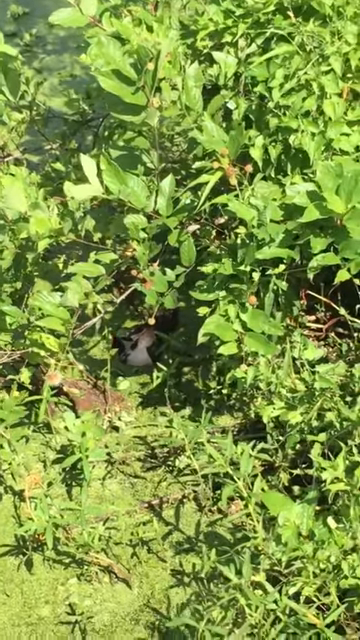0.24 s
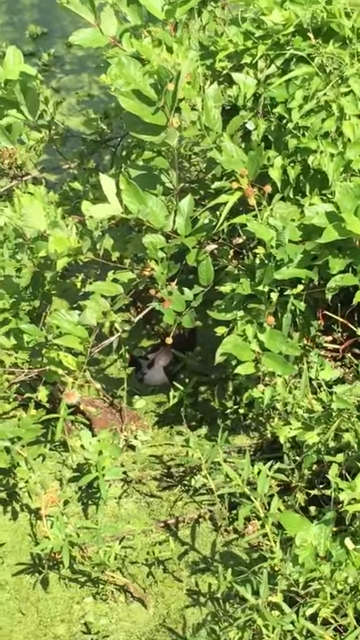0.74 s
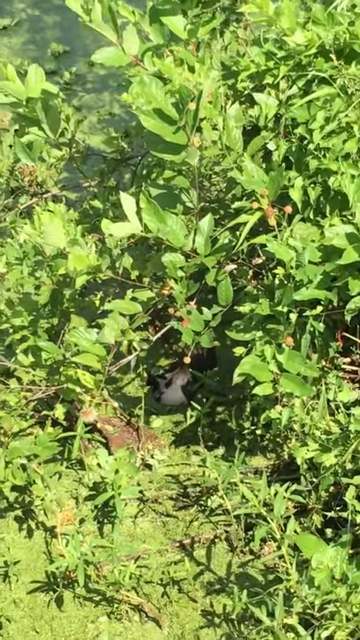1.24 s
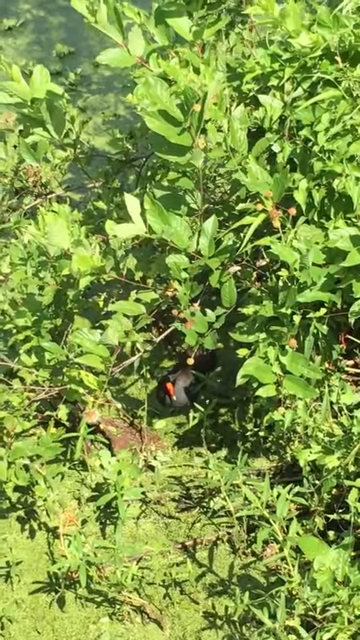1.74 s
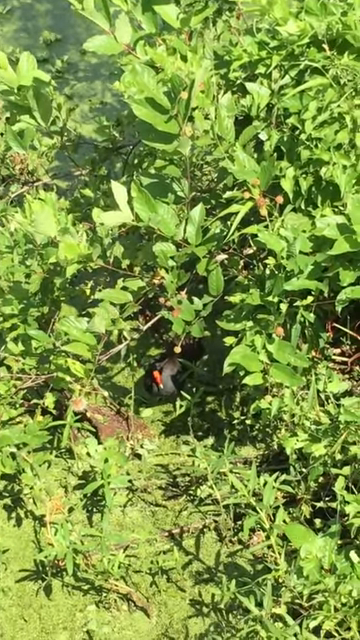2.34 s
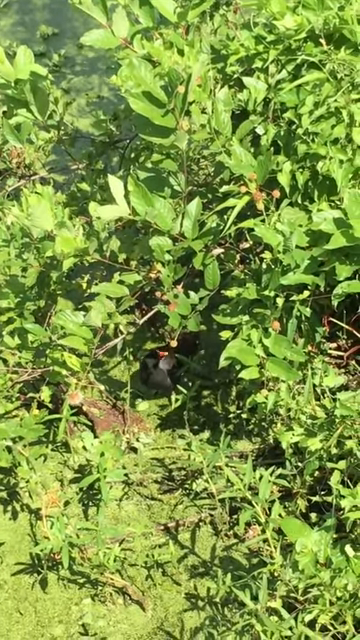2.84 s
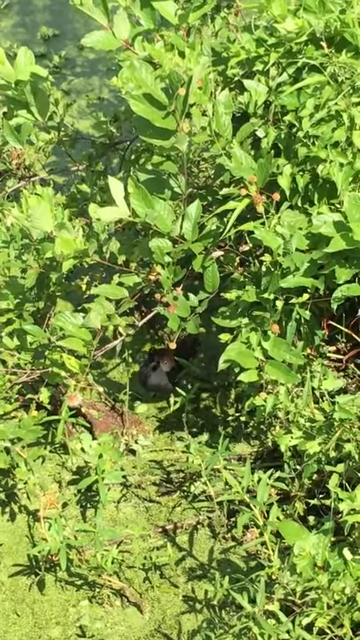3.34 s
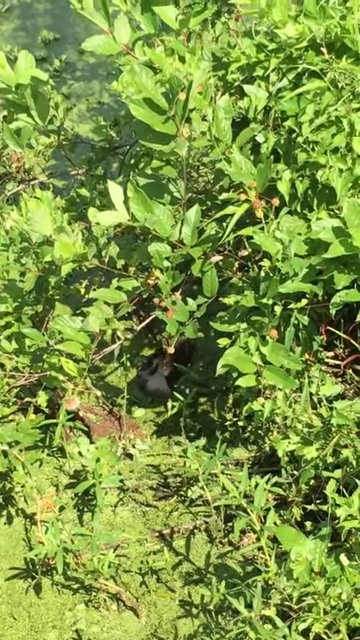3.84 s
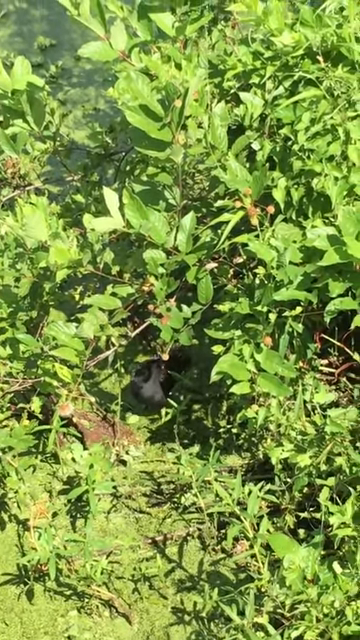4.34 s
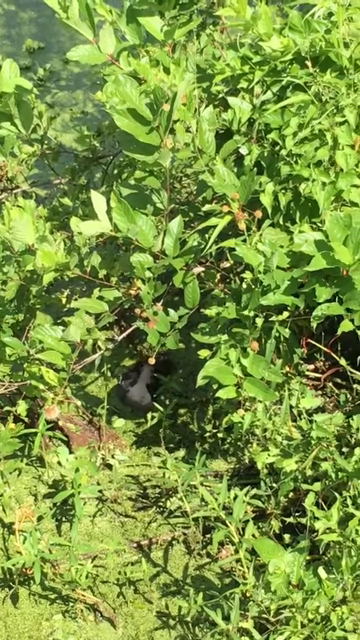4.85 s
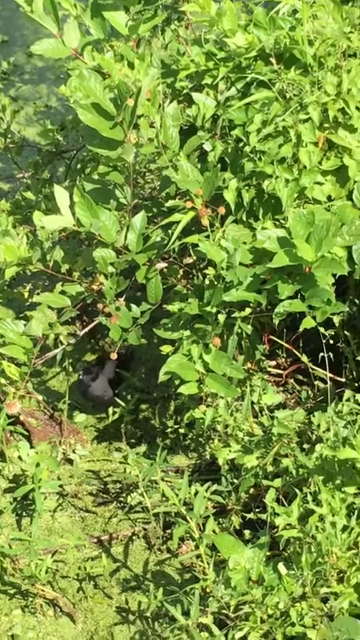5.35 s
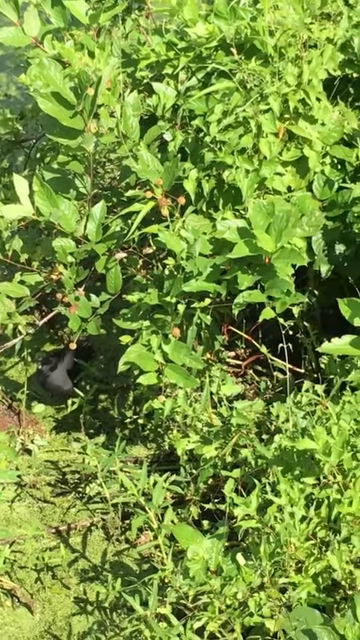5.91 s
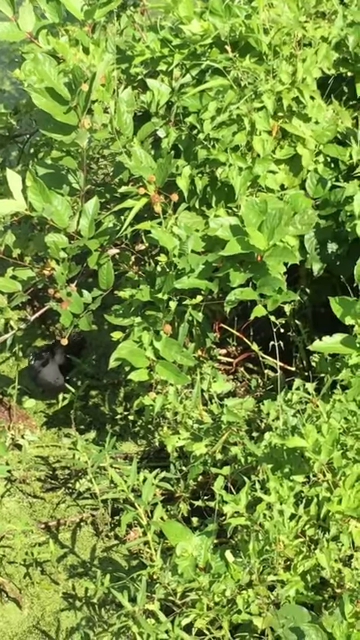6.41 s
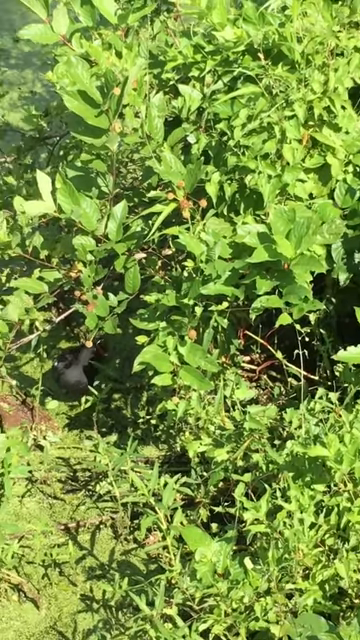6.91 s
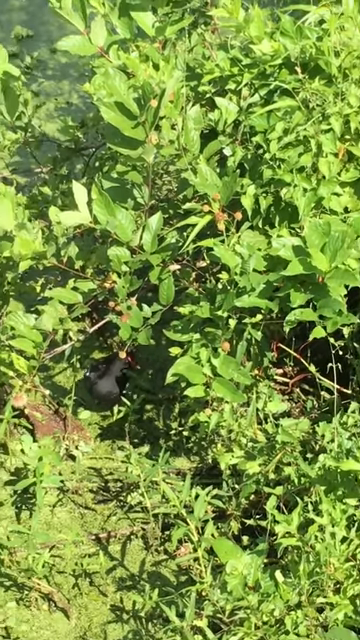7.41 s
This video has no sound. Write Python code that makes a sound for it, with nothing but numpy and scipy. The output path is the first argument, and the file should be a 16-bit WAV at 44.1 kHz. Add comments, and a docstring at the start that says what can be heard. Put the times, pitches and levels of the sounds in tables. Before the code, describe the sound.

A marsh bird gives two soft clucks and one loud sharp yelp, then scattered quiet cluck runs over a distant engine drone and swelling insects.

```python
"""A distant engine, made as a wavering sine over shaped noise, drones throughout at a pond's edge.
Two soft clucks of a gallinule lead into its sharp yelp: harmonics through a throat, breaking into a rasp.
Gliding sines whistle as songbirds from 1.2 s, with a faint coo at 3 s; clucks follow in three runs, from
2.0, 3.7 and 5.9 s. Shaped noise swells into an insect chorus, with two dull bumps at 2.6 s. A two-note
horn toots at 6.4 s. Filtered copies and noise echoes return the gallinule from bank, weeds and trees."""
import sys
import numpy as np
from scipy import signal
from scipy.fft import rfft, irfft
from scipy.io import wavfile
from scipy.ndimage import map_coordinates

SR = 44100
rng = np.random.default_rng(int(sys.argv[2]) if len(sys.argv) > 2 else 0)


def int16_out(signal):
    """Quantize to a 16-bit WAV file."""
    q = np.round(np.clip(np.atleast_2d(signal).T, -1, 1) * 32767)
    wavfile.write(sys.argv[1], SR, q.astype(np.int16))


N = 338247
TIME = np.arange(N) / SR

# Firing note of the distant engine. Each row: time in seconds, pitch in Hz.
ENGINE_PITCH = [(0.0, 74.5), (0.66, 76), (0.77, 73.5), (6.13, 73), (6.22, 72.5), (7.67, 72)]
# Level of the low drone, including a chance dip near 2.5 s, before its trim and waver.
# Each row: time in seconds, level in dB.
DRONE_LEVEL = [(0.0, -53), (0.13, -54.5), (2.31, -54), (2.52, -64), (2.56, -56), (3.35, -53.5),
               (3.4, -47.5), (5.11, -53), (5.75, -46.5), (6.02, -57.5), (6.45, -48), (6.86, -52.5),
               (7.35, -46.5), (7.67, -47)]
# Relative spectrum of the low outdoor rumble. Each row: frequency in Hz, density in dB per Hz.
RUMBLE_COLOUR = [(20, -30), (36, -8.5), (46, -8.5), (57, -2.5), (80, -6.5), (108, -7.5), (135, -13.5),
                 (200, -17), (280, -20.5), (450, -31), (900, -50.5)]
# Relative spectrum of the air hiss. Each row: frequency in Hz, density in dB per Hz.
AIR_COLOUR = [(300, -10.5), (600, 3.5), (1000, 1), (1500, -4), (2400, -3), (3000, 2), (4000, 1), (5000, -2),
              (6000, -0.5), (7500, -2.5), (9500, -14)]
# Swell of the insect chorus before its flicker. Each row: time in seconds, level in dB.
CHORUS_LEVEL = [(0, -87), (2.0, -80.5), (2.7, -73.5), (3.4, -65.5), (4.4, -63.5), (5.5, -65), (6.6, -63.5),
                (7.67, -66)]
# Relative spectrum of the chorus. Each row: frequency in Hz, density in dB per Hz.
CHORUS_COLOUR = [(2600, -35), (3000, -5), (3550, -4), (4400, -4), (4950, -12), (5600, -1.5), (6400, 0),
                 (6950, 3), (7400, -7), (8000, -30)]
# One insect on a single note, before its throb. Each row: time in seconds, level in dB.
CHIRPER_LEVEL = [(0, -77), (2.4, -74), (2.8, -68.5), (5.3, -65.5), (6.4, -65.5), (7.67, -81)]
# Soft bumps, before filtering. Each row: start in seconds, gain in dB.
BUMPS = [(2.598, -43), (2.641, -44)]
# The two notes of the car horn. Each row: pitch in Hz, relative level in dB.
HORN_NOTES = [(496, 1.5), (404, -5.5)]
# Response of the horn's flare. Each row: frequency in Hz, gain in dB.
HORN_FLARE = [(400, -5), (500, -4), (830, -5), (1000, -1.5), (1500, -0.5), (2000, 0.5), (2500, -14)]
# Far songbird whistles. Each row: start in seconds, length in seconds, first pitch in Hz,
# pitch at the turn in Hz, last pitch in Hz, level before flutter in dB.
WHISTLES = [(1.202, 0.21, 2900, 2500, 2760, -72.5), (1.53, .24, 2600, 2850, 2990, -73),
            (3.076, 0.2, 3080, 2705, 3110, -71.5), (3.32, .05, 3450, 3100, 2750, -74.5),
            (4.715, .11, 3120, 3270, 3350, -62.5), (4.809, .115, 3450, 3650, 3760, -64.5),
            (5.566, 0.054, 2440, 2445, 2520, -71), (5.68, 0.062, 2460, 2410, 2490, -70.5),
            (5.782, 0.083, 2480, 2380, 2420, -71), (6.916, 0.078, 3070, 2460, 2460, -65.5),
            (7.079, 0.138, 2930, 3120, 3145, -63.5), (7.098, .225, 2800, 2090, 3110, -69),
            (7.243, 0.082, 3860, 3790, 4100, -61.5), (7.334, 0.027, 3760, 3120, 2530, -66.5)]
# A faint far coo. Its one row: start in seconds, length in seconds, first pitch in Hz,
# pitch at the turn in Hz, last pitch in Hz, level before flutter in dB.
COO = (3, 0.8, 649, 623.5, 646, -80)
# Clucks. Each row: start in seconds, gain in dB, pitch before scoop and collapse in Hz, overtone gain in dB,
# extra gain above the second harmonic from an opening bill in dB, time constant of the held note in seconds.
CLUCKS = [(0.039, -45.5, 1118, -18.5, -4, 0.0055), (0.148, -41.5, 1110, -20, 1, 0.0052),
          (2.013, -57, 1055, -11, -4, .006), (2.0904, -47, 1043, -3, 1, 0.0063),
          (2.1905, -42, 1020, 0.5, -4.5, 0.0071), (2.299, -42.5, 1028, 4, -2.5, 0.011),
          (3.723, -57, 1080, -17, 0, .005), (3.8005, -51.5, 1076, -10.5, 0, .005),
          (3.891, -43.5, 1057, -8.5, 12, .008), (4.0077, -44, 1077, -8, 11.5, 0.0066),
          (5.8725, -51.5, 990, -13.5, 0, 0.0049), (5.9527, -49, 1099, -10, 1.5, 0.0058),
          (6.059, -44, 1008, 0, 0, 0.0094), (6.1775, -45, 993, 3.5, -3, 0.0073)]
# Response of the throat with the bill nearly shut. Each row: frequency in Hz, gain in dB.
SHUT_BILL = [(1200, -7), (1750, 1), (2030, -4), (2300, -9.5), (2600, -16), (3100, -19), (4000, -22),
             (5100, -19.5), (6200, -21.5), (8000, -31.5)]
# Relative spectrum of the rasp in the clucks. Each row: frequency in Hz, density in dB per Hz.
CLUCK_RASP = [(250, -25.5), (560, -4.5), (780, -8), (1150, 4.5), (1500, -8.5), (2000, 1.5), (2500, -15.5),
              (5500, -28), (8000, -31)]
# Response of throat and bill in the yelp. Each row: frequency in Hz, gain in dB.
THROAT = [(300, -3.5), (600, 0.5), (800, -31.5), (970, -17.5), (1350, -4.5), (1700, -3.5), (1980, -1),
          (2300, -41), (2970, -10), (3400, -6.5), (4000, -1), (5000, -12.5), (5500, -27), (5900, -14.5),
          (6900, -10.5), (7700, -25), (8900, -20)]
# Relative spectrum of the rasp in the yelp. Each row: frequency in Hz, density in dB per Hz.
YELP_RASP = [(200, -32), (600, -16.5), (900, -16), (1350, -5.5), (1850, -9), (2300, -27.5), (3200, -2),
             (4100, 1), (4700, -0.5), (5500, -14.5), (6600, -2.5), (7600, -24), (9000, -10.5)]
# Response of the reflecting weeds and trees. Each row: frequency in Hz, gain in dB.
ECHO_COLOUR = [(200, -15), (500, -1), (1000, 6), (1900, -4.5), (3000, -2.5), (4200, 3), (5500, -4),
               (7000, -2.5), (9000, -20)]

HORN_AT_S, HORN_S, HORN_GAIN_DB = 6.37, 0.098, -63.5
WHISTLE_TURN = 0.32  # share of its length at which a whistle turns
YELP_AT_S, YELP_S, YELP_HZ, YELP_GAIN_DB = 0.155, 0.049, 996, -21.5
# The pitch scoops up, then collapses: shares of the pitch, and times after the start.
SCOOP, SCOOP_S = 0.18, 0.00767
COLLAPSE, COLLAPSE_AFTER_S, COLLAPSE_S = 0.75, 0.0405, 0.0042
# The voice breaks before the collapse: roughness from 0 to 1.
CLEAR_ROUGH, BROKEN_ROUGH, BREAK_AFTER_S, BREAK_S = 0.059, 0.67, 0.0262, 0.0042
# The upper overtones are muffled until the bill opens.
MUFFLED_DB, OPEN_AFTER_S, OPEN_S = -6.5, 0.0158, 0.0006
CUTOFF_HZ = 9300


def from_db(db):
    """An amplitude ratio is ten to the power of its decibels over twenty."""
    return 10 ** (np.asarray(db) / 20)


def rms_one(x):
    """Division by the root mean square gives unit power."""
    return x / np.sqrt(np.mean(x ** 2) + 1e-20)


def in_time(rows):
    """A slow curve is interpolated linearly between its points in time."""
    seconds, values = np.transpose(rows)
    return np.interp(TIME, seconds, values)


def at_hz(points, hz):
    """A spectrum in decibels is interpolated along a logarithmic frequency axis."""
    f, db = np.transpose(points)
    return np.interp(np.log(np.maximum(hz, 1)), np.log(f), db)


def span(start_s, length_s, fade_s):
    """A finite note has sample indices, elapsed time and a gate with linear fades."""
    i = np.arange(int(start_s * SR), min(int((start_s + length_s) * SR), N))
    from_nearest_end = np.minimum(i - i[0], i[-1] - i)
    return i, (i - i[0]) / SR, np.clip(from_nearest_end / (fade_s * SR), 0, 1)


def step(t, at_s, width_s):
    """A hyperbolic tangent makes a smooth transition from 0 to 1 around a moment."""
    return 0.5 + 0.5 * np.tanh((t - at_s) / (2 * width_s))


def drift(rate, size=N):
    """Random knots, `rate` a second, joined by a spline give a smooth fluctuation of spread near 1."""
    knots = rng.standard_normal(int(size * rate / SR) + 4)
    return map_coordinates(knots, [1 + np.arange(size) * rate / SR], order=2)


def turn(hz):
    """Phase is the running integral of frequency."""
    return 2 * np.pi * np.cumsum(hz) / SR


def noise(spectrum):
    """White noise weighted in the frequency domain takes on a given colour, near unit power."""
    white = rng.standard_normal(2 ** 19)
    gain = from_db(at_hz(spectrum, np.linspace(0, SR / 2, 2 ** 18 + 1)))
    return rms_one(irfft(rfft(white) * gain))[:N]


def band(x, low_hz, high_hz):
    """A causal Butterworth band-pass keeps the energy between two frequencies."""
    sos = signal.butter(2, [low_hz, high_hz], "band", fs=SR, output="sos")
    return signal.sosfilt(sos, x + 1e-18)


def narrow_noise(hz, width):
    """Noise confined to a narrow band is heard as a blurred pitch."""
    return rms_one(band(rng.standard_normal(N), hz - width / 2, hz + width / 2))


def scatter(x, delay_s, rise_s, t60):
    """Convolution with delayed, decaying noise models many small reflections; t60 is in seconds."""
    t = np.maximum(TIME[:SR] - delay_s, 0)
    white = rng.standard_normal(SR)
    coloured = irfft(rfft(white) * from_db(at_hz(ECHO_COLOUR, np.arange(SR // 2 + 1))))
    shape = rms_one((1 - np.exp(-t / rise_s)) * from_db(-60 * t / t60))
    return signal.fftconvolve(x, coloured * shape / np.sqrt(SR))[:N]


def background(rumble_db=-55, air_db=-68.0, swell_db=1.23, drone_trim_db=-0.4, waver_db=1.2):
    """A periodic firing note is a sine of wavering level; rumble and air are broadband noise."""
    tone = np.sqrt(2) * np.sin(turn(in_time(ENGINE_PITCH)))
    drone = from_db(drone_trim_db + in_time(DRONE_LEVEL) + waver_db * drift(9)) * tone
    rumble = from_db(rumble_db + swell_db * drift(5)) * noise(RUMBLE_COLOUR)
    return drone + rumble + from_db(air_db) * noise(AIR_COLOUR)


def insects(chirp_rate=7.0, haze_db=-75, whine_db=-74, flicker_db=0.5, flutter_db=2.5, throb_db=4.0):
    """Many unsynchronised singers sum to band noise; one chirper is modulated in amplitude."""
    chorus = from_db(in_time(CHORUS_LEVEL) + flicker_db * drift(70)) * noise(CHORUS_COLOUR)
    haze = from_db(haze_db + flicker_db * drift(50)) * narrow_noise(hz=8480, width=1100)
    whine = from_db(whine_db + flutter_db * drift(60)) * narrow_noise(hz=8624, width=150.0)
    chirp_phase = turn(chirp_rate * (1 + 0.25 * drift(5.7)))
    throb = from_db(throb_db * (np.sin(chirp_phase) - 2.0))
    chirper = from_db(in_time(CHIRPER_LEVEL)) * throb * narrow_noise(hz=3559, width=100)
    return chorus + haze + whine + chirper


def bumps(decay_s=0.02, top_hz=170):
    """A dull knock is low-frequency noise under a sudden onset and exponential decay."""
    shape = np.zeros(N)
    for s, db in BUMPS:
        shape += from_db(db) * (TIME > s) * np.exp(-np.abs(TIME - s) / decay_s)
    low_noise = rms_one(band(rng.standard_normal(N), 20, top_hz))
    return band(shape * low_noise, 20, 197)


def horn(waver=0.0088, sag_db_per_s=60):
    """Two harmonic series sound together, each weighted by the response of the flare."""
    out = np.zeros(N)
    i, t, gate = span(HORN_AT_S, HORN_S, fade_s=0.022)
    for hz, db in HORN_NOTES:
        phase = turn(hz * (1 + waver * drift(150, size=len(i))))
        tone = sum(from_db(at_hz(HORN_FLARE, k * hz)) * np.sin(k * phase) for k in range(1, 6))
        out[i] += gate * from_db(HORN_GAIN_DB + db - sag_db_per_s * t) * tone
    return out


def songbirds(waver=0.0096, flutter_db=3.0):
    """A whistle or coo is a nearly pure tone, gliding through a turning pitch with a fluttering level."""
    out = np.zeros(N)
    for s, length, first_hz, turn_hz, last_hz, level_db in WHISTLES + [COO]:
        i, t, gate = span(s, length, fade_s=0.011)
        before = np.clip(1 - t / length / WHISTLE_TURN, 0, 1)
        after = np.clip((t / length - WHISTLE_TURN) / (1 - WHISTLE_TURN), 0, 1)
        ease = np.sin(np.pi / 2 * after)
        pitch = turn_hz + (first_hz - turn_hz) * before + (last_hz - turn_hz) * ease
        phase = turn(pitch * (1 + waver * drift(120, size=len(i))))
        level = from_db(level_db + flutter_db * drift(60.3, size=len(i)))
        out[i] += gate * level * np.sin(phase)
    return out


def clucks(attack_s=0.0012, scoop=0.17, sag=0.341, ring_db=-17, ring_s=0.0078, rasp_db=-7, rasp_s=0.014):
    """A brief harmonic source scoops up, holds and collapses, with a weak ringing tail and decaying rasp."""
    out, t = np.zeros(N), TIME[:SR // 15]
    rasp = noise(CLUCK_RASP)
    for s, gain_db, pitch, overtones_db, bill_db, length in CLUCKS:
        i = int(s * SR) + np.arange(len(t))
        onset = 1 - np.exp(-(t / attack_s) ** 2)
        held = np.exp(-(t / length) ** 4)
        collapse = 1 - np.exp(-(t / (2 * length)) ** 4)
        hz = pitch * (1 - scoop * np.exp(-t / attack_s) - sag * collapse)
        tone = np.sin(turn(hz))
        for k in np.arange(2, 8):
            gain = from_db(overtones_db + at_hz(SHUT_BILL, k * hz) + bill_db * (k > 2))
            tone += gain * np.sin(turn(k * hz) + rng.uniform(0, 2 * np.pi))
        voiced = tone * (held + from_db(ring_db) * np.exp(-t / ring_s))
        # stronger overtones bring more rasp
        rough = from_db(rasp_db + overtones_db / 2) * rasp[i] * np.exp(-t / rasp_s)
        out[i] += from_db(gain_db) * onset * (voiced + rough)
    return out


def yelp(attack_s=0.0054, hold_s=0.036, release_db_per_s=2500, slack_db=-19, jitter=0.04, shimmer=0.7,
         rasp_db=-3, dulling_db=11):
    """Source and filter: throat resonances weight a harmonic voice that roughens, then collapses in pitch."""
    i, t, gate = span(YELP_AT_S, YELP_S, fade_s=0.001)
    collapse = COLLAPSE * step(t, COLLAPSE_AFTER_S, COLLAPSE_S)
    pitch = YELP_HZ * (1 - SCOOP * np.exp(-(t / SCOOP_S) ** 2)) * (1 - collapse)
    rough = CLEAR_ROUGH + (BROKEN_ROUGH - CLEAR_ROUGH) * step(t, BREAK_AFTER_S, BREAK_S)
    overtones_db = MUFFLED_DB * (1 - step(t, OPEN_AFTER_S, OPEN_S))
    onset = 1 - np.exp(-(t / attack_s) ** 3)
    release_db = -release_db_per_s * np.maximum(t - hold_s, 0)
    envelope = onset * from_db(YELP_GAIN_DB + slack_db * collapse + release_db)
    phase = turn(pitch * (1 + jitter * rough * drift(900, size=len(i))))
    slack = 1 - pitch / pitch.max()
    voice = np.zeros(len(i))
    for k in np.arange(1, 17):
        hz = k * pitch
        upper = np.clip((hz - 2000) / 800, 0, 1)
        top = np.clip((hz - 4500) / 500, 0, 4)
        # the open bill lets out the upper resonances; a slack membrane loses the very top
        gain = from_db(at_hz(THROAT, hz) + overtones_db * upper - dulling_db * slack * top)
        harmonic = np.sin(k * phase + rng.uniform(0, 2 * np.pi))
        voice += gain * harmonic * (1 + shimmer * rough * drift(700, size=len(i)))
    # slower pulses carry less power
    voice *= np.sqrt(2 * (1 - slack))
    # turbulence comes in puffs, one each cycle
    voice += from_db(rasp_db) * rough * noise(YELP_RASP)[i] * (1 + np.cos(phase))
    out = np.zeros(N)
    out[i] = voice * gate * envelope
    return out


def marsh(x, bank_s=0.0098, bank_db=-16, weeds_db=-14, trees_db=-31, tail_db=-28):
    """Reflection adds a discrete band-limited slap from the bank, and diffuse returns from weeds and trees."""
    bank = from_db(bank_db) * np.interp(TIME - bank_s, TIME, band(x, 400, 2000))
    weeds = from_db(weeds_db) * scatter(x, delay_s=0.0034, rise_s=0.002, t60=0.13)
    trees = from_db(trees_db) * scatter(x, delay_s=0.125, rise_s=0.0061, t60=0.274)
    tail = from_db(tail_db) * scatter(x, delay_s=0.03, rise_s=0.01, t60=0.708)
    return x + bank + weeds + trees + tail


def scene():
    """By superposition, the pressures of near bird, far sounds and surroundings add."""
    surroundings = background() + insects() + bumps()
    far_horn, far_song = horn(), songbirds()
    # strong scatter blurs the far sounds
    far_horn = far_horn + from_db(-2.5) * scatter(far_horn, delay_s=0.005, rise_s=0.01, t60=1.0)
    far_song = far_song + from_db(-6.5) * scatter(far_song, delay_s=0.0028, rise_s=0.0063, t60=0.38)
    gallinule = marsh(yelp() + clucks())
    return (gallinule + far_horn + far_song + surroundings)[None]


def record(dry):
    """An elliptic low-pass removes the top of the spectrum with a steep edge."""
    sos = signal.ellip(10, 0.2, 80, CUTOFF_HZ, fs=SR, output="sos")
    return signal.sosfilt(sos, dry)


dry = scene()
out = record(dry)
int16_out(out)
```